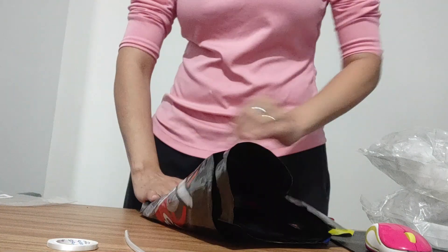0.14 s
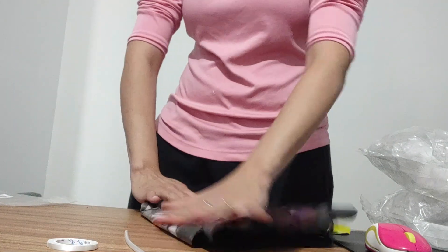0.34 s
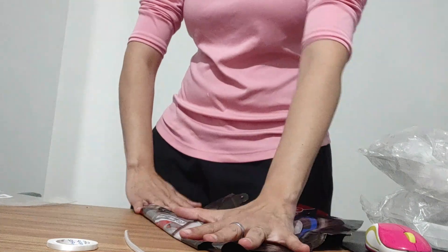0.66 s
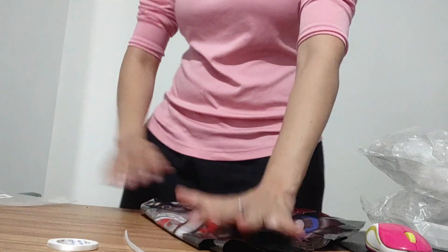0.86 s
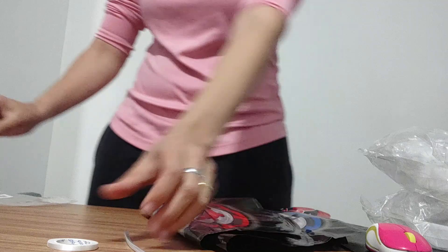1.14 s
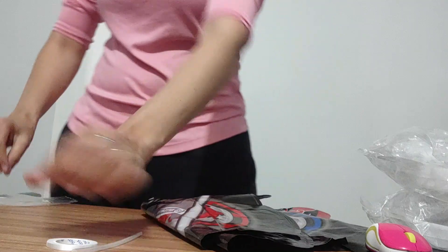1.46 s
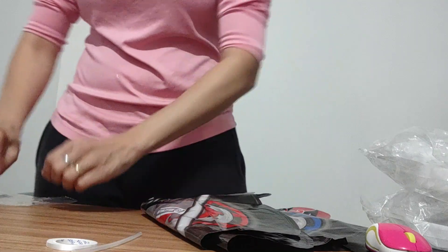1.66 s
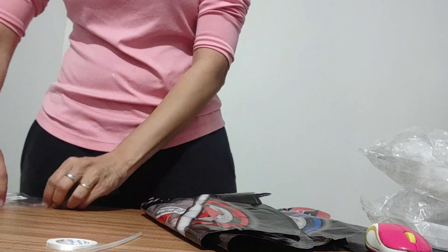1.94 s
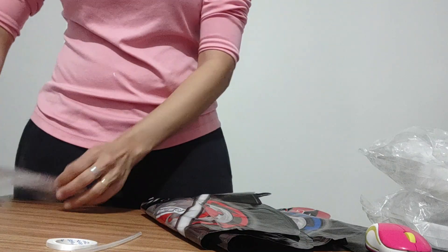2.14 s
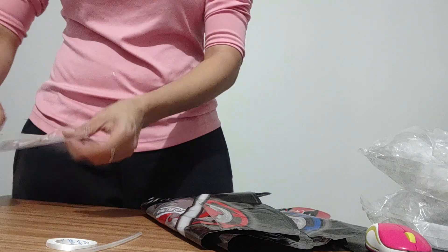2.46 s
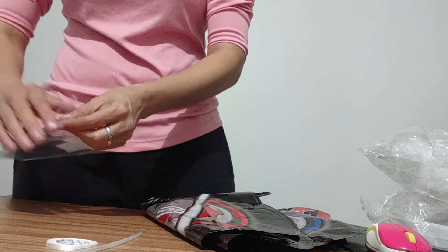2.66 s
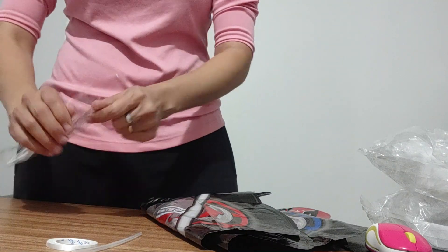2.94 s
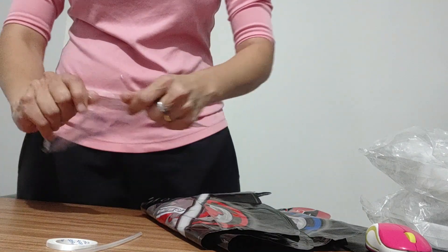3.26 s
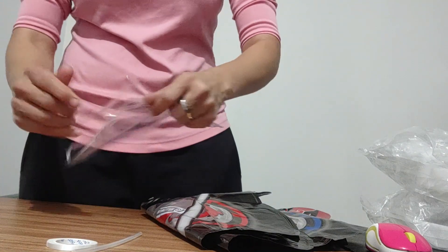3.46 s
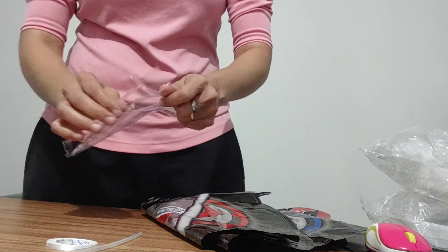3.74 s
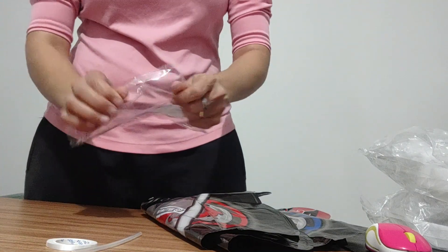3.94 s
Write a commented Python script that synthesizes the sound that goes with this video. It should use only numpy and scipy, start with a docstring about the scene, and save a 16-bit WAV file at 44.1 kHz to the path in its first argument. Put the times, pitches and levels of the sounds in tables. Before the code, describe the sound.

Close, short bursts of crinkling foil and thin plastic, with sharp snaps and hands softly brushing a wooden table in a bare room.

```python
"""A bare room, close to a wooden table, two microphone ports a few centimetres apart. Hands fold foil balloons
flat, then pick up and pull open a thin plastic bag. Creases in the film buckle: a dense crackle with single
loud snaps. Hands brush the table top, which hums; a low rustle of the handled film follows each crumple. The
ports hear the film first on one side, then on the other; short echoes and room tone lie behind."""
import sys
import numpy as np
from scipy import signal
from scipy.io import wavfile

SR = 44100
rng = np.random.default_rng(int(sys.argv[2]) if len(sys.argv) > 2 else 0)


def digitize_waveform(pressure):
    """Quantize a signal to 16-bit integers and store it at the path in sys.argv[1].

    Rows of a 2-D input are taken as channels; values are limited to [-1, 1].
    """
    field = np.atleast_2d(pressure).T
    bounded = np.clip(field, -1, 1)
    quanta = np.round(bounded * 32767).astype(np.int16)
    wavfile.write(sys.argv[1], SR, quanta)


N = 180669

# the loudest single buckles: t/s, body/dB, crackle/dB, sizzle/dB
SNAPS = [(0.0267, -35, -19, -39), (0.045, -49, -32, -40), (0.0676, -42, -35, -31), (0.0856, -45, -26, -23),
         (0.118, -44, -31, -31), (0.1435, -45, -25, -30), (0.1807, -25, -32, -28.5), (0.269, -49, -26, -37),
         (0.3315, -38, -21, -30), (0.3403, -53, -32, -47), (0.367, -34, -33, -49), (0.39, -41, -16.5, -27),
         (0.405, -29, -9.5, -13.5), (0.4227, -35, -10, -18), (0.4329, -30, -9, -13), (0.463, -31, -11, -18),
         (0.4958, -42, -10, -12), (0.531, -31, -23, -17), (0.54, -36, -17, -18), (0.556, -28, -23, -16),
         (0.584, -36, -15, -10), (0.6, -41, -21, -26), (0.7089, -36, -17.5, -32), (0.739, -29.5, -20, -21),
         (0.7662, -50, -36, -46), (0.8261, -61, -28.5, -34), (0.8996, -35, -36, -34),
         (0.906, -30, -32, -33), (0.95, -60, -28, -24.5), (1.0413, -48, -34, -37), (1.0883, -34, -45, -46),
         (1.179, -44, -41, -52), (1.202, -50, -38, -44), (1.227, -40, -29.5, -49), (1.3096, -38, -35, -64),
         (1.318, -36, -27, -42), (1.3397, -43.5, -30, -75), (1.4166, -41, -29.5, -40),
         (1.4404, -57, -31, -39), (1.8494, -44, -38, -62), (1.8584, -71, -32, -40.5),
         (1.8958, -48, -35, -33), (1.967, -60, -35, -51), (1.9945, -67, -36, -50),
         (2.0203, -79, -23.5, -23), (2.0346, -44, -27, -27.5), (2.0595, -77, -25.5, -27),
         (2.067, -64, -31, -34), (2.0918, -62, -28, -17.5), (2.0984, -70, -34, -28),
         (2.1033, -70, -26, -19), (2.1191, -76, -20.5, -28), (2.1289, -40, -34, -32), (2.14, -66, -22, -39),
         (2.1623, -34, -28, -29), (2.172, -50, -23, -28), (2.187, -54, -25, -18), (2.2109, -66, -19, -6),
         (2.2326, -52, -21, -11), (2.2415, -45, -11, -16), (2.2876, -18, -24, -5), (2.3007, -31, -13, -10),
         (2.3546, -35, -14, -9), (2.365, -40, -22, -18), (2.377, -24, -30, -30), (2.4054, -43, -18, -19),
         (2.438, -50, -20, -31), (2.5094, -38, -20, -44), (2.5412, -43, -26, -18), (2.59, -30, -11.5, -25),
         (2.6095, -42, -28, -23), (2.6803, -46, -41, -32), (2.7084, -33, -29, -31), (2.74, -32, -17.5, -34),
         (2.748, -28, -60, -12.5), (2.7604, -31, -53, -21), (2.837, -61, -23, -42), (2.8734, -58, -36, -30),
         (2.9027, -46, -25, -39), (2.9269, -57, -11, -35), (2.9322, -30, -42, -21),
         (2.983, -24.5, -40, -14.5), (3.0087, -17, -20, -10.5), (3.0237, -40, -19, -9),
         (3.037, -32, -18, -8), (3.0676, -11, -30, -4), (3.092, -7.5, -6.5, -17), (3.1345, -10.5, -4.5, -5),
         (3.14, -40, -30, -10), (3.1869, -13.5, -9, -14), (3.2022, -16, -16, -11), (3.2304, -9, -1, -13.5),
         (3.2458, -18, -12, -10.5), (3.2811, -7, -11.5, -3.5), (3.3001, -8, -13, -11.5),
         (3.3622, -11, -29, -20), (3.4227, -23.5, -46, -24), (3.4396, -27, -23.5, -34),
         (3.4669, -22.5, -21.5, -14.5), (3.4812, -27, -37, -8), (3.571, -29, -27, -27),
         (3.578, -26.5, -31, -30), (3.7785, -27.5, -21, -15), (3.7947, -58, -27, -34),
         (3.8703, -29, -28, -67), (3.9079, -28, -29, -52), (3.9547, -36, -28, -18),
         (3.9644, -36, -27.5, -20), (3.9908, -17, -16.5, -26), (4.0099, -16, -3, -9),
         (4.0372, -30, -16, -12), (4.0405, -14, -11, -16), (4.0506, -10, -6, -10), (4.057, -36, -16, -3.5),
         (4.0667, -12, -6, -4), (4.0759, -20, -8, -5)]
# squeezes and pulls of the film: full from t/s, rise/s, hold/s, fall/s, body/dB, crackle/dB, sizzle/dB
CRUMPLES = [(0.0, .01, .005, 0.052, -38.5, -36, -38), (.105, 0.17, 0.0056, 0.13, -41, -37.5, -42.5),
            (.19, 0.19, 0.095, .3, -50, -55, -59.5), (.393, 0.0085, 0.033, .05, -36, -27.5, -34.5),
            (.428, 0.04, 0.0058, 0.095, -29, -26, -27.5), (.47, 0.045, 0.11, 0.18, -34, -31, -34),
            (.736, 0.11, 0.0045, 0.089, -52, -41.5, -51.5), (.9, 0.15, 0.047, 0.11, -52.5, -47, -51.5),
            (.99, 0.088, 0.079, 0.17, -55.5, -57, -61), (1.23, .1, .01, 0.1, -59, -56, -63),
            (1.33, .05, 0.14, 0.12, -57, -52.5, -70.5), (1.87, 0.038, 0.074, 0.17, -72, -54.5, -59.5),
            (2.1, 0.16, 0.11, 0.11, -54, -51.5, -51), (2.245, 0.046, 0.0078, 0.17, -37, -27.5, -28),
            (2.355, 0.027, .01, 0.083, -37, -42, -31.5), (2.43, 0.1, 0.016, 0.03, -39, -38, -37),
            (2.54, 0.052, 0.015, 0.099, -33.5, -35.5, -40),
            (2.751, 0.027, 0.0031, 0.054, -45.5, -39.5, -46), (2.83, 0.12, 0.018, .1, -49, -56, -60),
            (2.933, 0.052, 0.0044, 0.07, -58, -38, -56), (3.068, 0.12, 0.011, 0.097, -29, -29.5, -30),
            (3.14, 0.087, 0.097, 0.11, -37, -33.5, -43.5),
            (3.291, 0.068, 0.0033, 0.078, -31.5, -26.5, -35.5), (3.36, 0.04, 0.012, 0.051, -33.5, -40, -55),
            (3.488, 0.019, 0.0053, 0.051, -32.5, -33, -39.5), (3.6, 0.088, .03, 0.36, -56, -56.5, -70),
            (3.8, 0.07, 0.014, 0.32, -51.5, -50, -60.5), (4.0, 0.031, 0.045, 0.066, -34.5, -31, -36.5),
            (4.047, 0.05, 0.029, 0.023, -30.5, -27.5, -30.5)]
# film left alone still ticks: body/dB, crackle/dB, sizzle/dB
SETTLING_DB = [-63.5, -71, -77.5]
# spectrum of the foil: f/Hz, level/dB
FOIL_SPECTRUM = [(250, -15.5), (430, 5), (800, 7.5), (1500, 10), (3000, 7), (5500, 9.5), (8000, 6.5),
                 (11000, 4), (16000, -5)]
# the thin bag against the foil: f/Hz, level/dB
BAG_COLOUR = [(250, 3), (900, -1), (1600, -1.5), (2800, 2), (5500, 0), (9000, -0.5), (16000, 2)]
# side on which the film is worked: t/s, left minus right/dB
FILM_SIDE = [(0, 3), (.4, 0.5), (.75, 0.5), (1.2, 1.5), (1.8, 0), (2.25, -1), (2.6, -1.0), (3.0, 0.5),
             (3.3, -1), (3.5, 2.5), (3.8, 2), (4.1, 1.5)]
# lag at the left port, set by where the film is held: t/s, lag/samples
LEFT_LAG = [(0, -2), (1.6, -2), (1.8, 6), (3.9, 6), (3.95, 3), (4.1, 3)]
# the left port is brighter: f/Hz, left minus right/dB
PORT_BALANCE = [(700, -1), (4400, 0), (8000, -1.5), (15000, 6)]
# film sound that only one port hears: f/Hz, share
UNSHARED = [(300, 0.029), (1500, 0.57), (5000, 0.42), (15000, 1)]
# hands on the table top: full from t/s, rise/s, hold/s, fall/s, brushing/dB, pressing/dB
TOUCHES = [(0.0, .01, 0.003, 0.026, -35, -41.5), (.41, 0.049, .02, 0.16, -42.5, -48.5),
           (.55, 0.044, .01, 0.079, -60, -48.5), (1.318, .015, 0.12, .12, -51, -61),
           (1.905, .05, .04, .12, -48, -66), (2.244, 0.061, 0.0072, 0.049, -38.5, -58.5),
           (2.435, 0.09, 0.0077, 0.029, -56, -51.5)]
# resonances of the board: f/Hz, width/Hz, level/dB
BOARD_MODES = [(221.8, 19.5, -3), (273.5, 10.5, 1), (319.2, 17, 4.5), (384, 44, -2), (646, 180, -9.5),
               (960, 63, -3.5), (1380, 21, -11), (1520, 32, -22)]
# the whole table rocking on its legs: f/Hz, width/Hz, level/dB
LEG_MODES = [(79, 46, 1), (128.7, 56, 6.5)]
# low rustle of the handled film, against the body of each crumple: low middle/dB, bass/dB
LOW_RUSTLE_DB = [-14.0, -31.0]
# time the echoes take to fall 60 dB: f/Hz, t/s
ROOM_T60 = [(200, 0.8), (1000, 0.32), (5000, 0.38), (15000, 0.3)]
# spectrum of the room tone: f/Hz, level/dB
TONE_SPECTRUM = [(15, -54), (25, -15), (97, -1.5), (145, -14), (166, -3), (217, -3.5), (384, -5),
                 (607, -19), (754, 4), (1330, -25), (16000, -20)]
# room sound at the two ports: f/Hz, left-right likeness
ROOM_LIKENESS = [(60, 0.5), (400, 0.76), (1500, 0.027), (3000, 0.1), (16000, 0.021)]
COLOUR_HZ = 900, 3800, 10500   # centres of body, crackle and sizzle
EDGES = 25 * 2 ** np.arange(0, 9.6, .5)   # half-octave band edges: f/Hz


def film(bag_from_s=1.7, late_s=0.00068, burst_s=0.00067, onset_speed=3.0, snap_db=10, scatter_db=1.5):
    """Buckles are bursts of noise; the treble leaves the crease first, the middle lags and lasts longer."""
    colour_db = add_db(gestures(CRUMPLES), np.array(SETTLING_DB)[:, None])
    side_db = in_time(FILM_SIDE)[0]
    small = buckles(per_s=1500, clump_db=2.5, size_db=1.0)
    small += from_db(-11) * buckles(per_s=80, clump_db=2.0, size_db=3.0)
    snap_s, *snap_colour_db = np.transpose(SNAPS)
    at, sides = (snap_s * SR).astype(int), np.array([[.5], [-.5]])
    white, out = rng.standard_normal((2, 2, N)), np.zeros((2, N))
    is_bag = np.arange(N) > bag_from_s * SR
    chance = rng.standard_normal((len(at), len(EDGES)))
    direction = np.sign(chance[:, 0])
    snap_side_db = side_db[at] + 1.5 * chance[:, 1]   # snaps scatter about the side being worked
    for k, (low, high) in enumerate(zip(EDGES, EDGES[1:])):
        hz = np.sqrt(low * high)
        if hz < 150:
            continue
        shares = [np.interp(np.log(hz), np.log(COLOUR_HZ), share) for share in np.eye(3)]
        body, crackle, _ = shares
        level_db = np.dot(shares, colour_db) + 1.2 * drift(30)
        power = small * from_db(2 * (level_db + sides * side_db))
        snap = np.dot(shares, snap_colour_db) + snap_db + scatter_db * chance[:, k]
        push = np.zeros((2, N))
        if hz < 2200:   # long waves feel a snap as one single push
            snap -= 1.5 * max(np.log2(603 / hz), 0)   # a crease is small: its bass thins 1.5 dB an octave
            sign = (-1) ** k * direction   # alternates so that the bands join up
            push[:, at + 30] = sign * from_db(snap + sides * snap_side_db)
        else:
            np.add.at(power, (slice(None), at), from_db(2 * (snap + sides * snap_side_db)))
        slow = np.exp(-1 / (SR * burst_s * (1 + 0.61 * crackle + 0.44 * body)))
        quick = slow ** onset_speed   # a burst starts faster than it dies
        bursts = signal.lfilter([(1 - slow) * (1 - quick)], [1, -slow - quick, slow * quick], power + 1e-18)
        bursts = np.roll(bursts, int(late_s * crackle * SR), axis=1)
        excited = push + np.sqrt(bursts) * pair(1 - at_hz(UNSHARED, hz), white[k % 2])
        film_db = at_hz(FOIL_SPECTRUM, hz) + is_bag * at_hz(BAG_COLOUR, hz)
        out += from_db(film_db + sides * at_hz(PORT_BALANCE, hz)) * band(excited, low, high)
    return out


def buckles(per_s, clump_db, size_db):
    """Power of the small random buckles, which come in clumps; mean 1."""
    born = rng.random(N) < per_s * from_db(clump_db * drift(25)) / SR
    power = born * from_db(2 * size_db * np.minimum(rng.exponential(1, N), 4))
    return power / power.mean()


def ports(x):
    """The left port hears the film a few samples early or late."""
    lag = np.round(in_time(LEFT_LAG)[0]).astype(int)
    heard = np.clip(np.arange(N) - lag, 0, N - 1)
    return np.array([x[0, heard], x[1]])


def table_and_rustle():
    """Brushing sounds the board, pressing rocks the table; a low rustle of film follows each crumple."""
    rustle_db = np.add.outer(LOW_RUSTLE_DB, gestures(CRUMPLES)[0])
    low_middle_db, bass_db = add_db(gestures(TOUCHES), rustle_db)
    return hum(BOARD_MODES, low_middle_db) + hum(LEG_MODES, bass_db)


def hum(modes, level_db):
    """Uneven friction noise sets resonances humming."""
    rub = pair(0.82, rng.standard_normal((2, N))) * from_db(drift(13))
    out = 0
    for k, (hz, width_hz, mode_db) in enumerate(modes):
        r = np.exp(-np.pi * width_hz / SR)
        feedback = [1, -2 * r * np.cos(2 * np.pi * hz / SR), r * r]
        ring = signal.lfilter([(1 - r * r) / 2, 0, (r * r - 1) / 2], feedback, rub)
        out += (-1) ** k * from_db(mode_db) * ring
    return from_db(level_db) * rms_one(out)


def room(x, first_echo_s=0.0053, level_db=-10):
    """After a gap the walls answer the right channel with dense stereo echoes that die band by band."""
    t, echoes = np.arange(SR // 2 + SR // 4) / SR, 0
    for low, high in zip(EDGES, EDGES[1:]):
        hz = np.sqrt(low * high)
        noise = pair(at_hz(ROOM_LIKENESS, hz), rng.standard_normal((2, len(t))))
        echoes += band(noise, low, high) * from_db(-60 * t / at_hz(ROOM_T60, hz))
    echoes *= np.clip((t - first_echo_s) / 0.006, 0, 1)
    echoes = from_db(level_db) * rms_one(echoes) / np.sqrt(len(t))
    return signal.fftconvolve(x[1:], echoes, axes=1)[:, :N]


def room_tone(level_db=-62):
    """Steady faint noise of the room and the microphones."""
    white, out = rng.standard_normal((2, 2, N)), 0
    for k, (low, high) in enumerate(zip(EDGES, EDGES[1:])):
        hz = np.sqrt(low * high)
        noise = pair(at_hz(ROOM_LIKENESS, hz), white[k % 2])
        out += from_db(at_hz(TONE_SPECTRUM, hz)) * band(noise, low, high)
    return from_db(level_db) * rms_one(out)


def gestures(rows, swing_db=20):
    """One dB curve per level column; each row swings by swing_db over its rise and fall; powers add."""
    t, power = np.arange(0, N + 40, 40) / SR, 1e-12
    for full_s, rise_s, hold_s, fall_s, *levels_db in rows:
        up = swing_db * (t - full_s) / rise_s
        down = swing_db * (full_s + hold_s - t) / fall_s
        shape_db = np.minimum(np.minimum(up, down), 0)
        power += from_db(2 * np.add.outer(levels_db, shape_db))
    return np.array(in_time(np.vstack([t, 10 * np.log10(power)]).T))


def drift(rate_hz):
    """Slow random wander of unit rms."""
    r = np.exp(-2 * np.pi * rate_hz / SR)
    return rms_one(signal.lfilter([1], [1, -2 * r, r * r], rng.standard_normal(N + 9000))[9000:])


def pair(alike, white):
    """Two channels of noise with the given likeness."""
    alike = np.clip(alike, -1, 1)
    return np.sqrt(1 + alike) * white[0] + np.sqrt(1 - alike) * white[1] * [[1], [-1]]


def band(x, low, high):
    """Band-pass; power per Hz is kept."""
    return signal.sosfilt(signal.butter(2, [low, high], "band", fs=SR, output="sos"), x)


def in_time(rows):
    """Columns of a curve table at every sample."""
    times, *columns = np.transpose(rows)
    return [np.interp(np.arange(N) / SR, times, column) for column in columns]


def at_hz(points, hz):
    """A spectrum read on a log axis."""
    freqs, values = np.transpose(points)
    return np.interp(np.log(hz), np.log(freqs), values)


def from_db(db):
    """Gain of a level."""
    return 10 ** (np.asarray(db) / 20)


def add_db(a_db, b_db):
    """Level of two unrelated sounds together."""
    return 10 * np.log10(from_db(2 * a_db) + from_db(2 * b_db))


def rms_one(x):
    """Scale to unit rms."""
    return x / np.sqrt(np.mean(x ** 2) + 1e-20)


def scene():
    """Film and table near the microphones, the walls and the room tone behind."""
    near = ports(film()) + table_and_rustle()
    return near + room(near) + room_tone()


def record(dry, low_cut_hz=42, high_cut_hz=16200):
    """The loudest snaps clip; the deepest bass and the top are cut."""
    clipped = np.clip(dry, -.95, .95)
    thinned = signal.sosfilt(signal.butter(2, low_cut_hz, "high", fs=SR, output="sos"), clipped)
    return signal.sosfilt(signal.ellip(12, .5, 65, high_cut_hz, fs=SR, output="sos"), thinned)


dry = scene()
out = record(dry)
digitize_waveform(out)
```